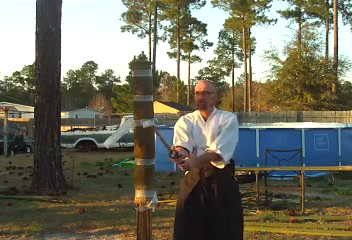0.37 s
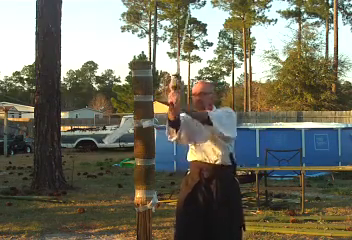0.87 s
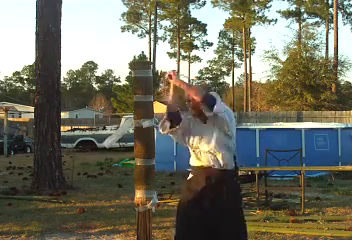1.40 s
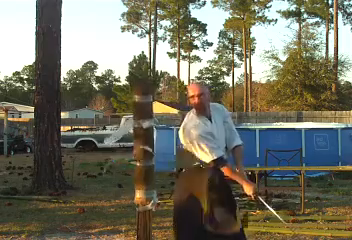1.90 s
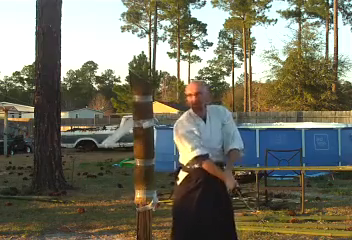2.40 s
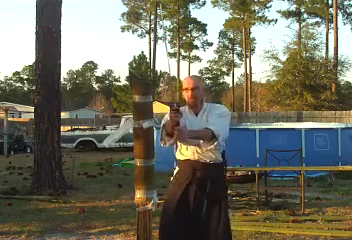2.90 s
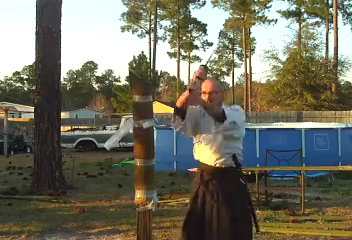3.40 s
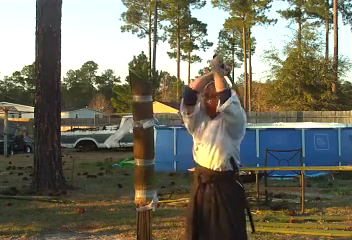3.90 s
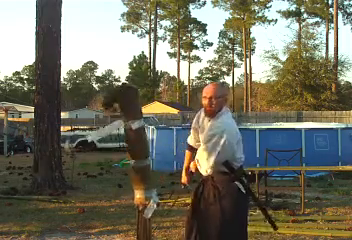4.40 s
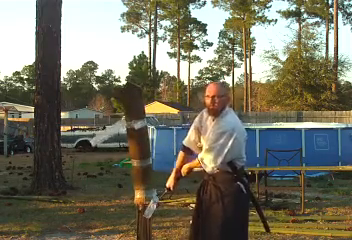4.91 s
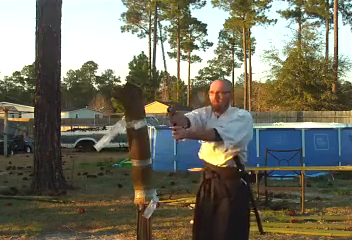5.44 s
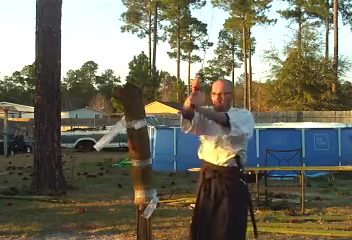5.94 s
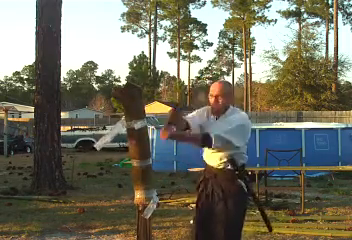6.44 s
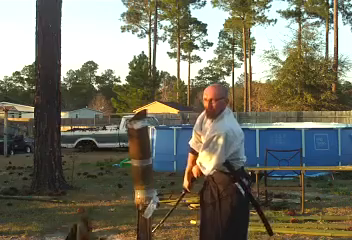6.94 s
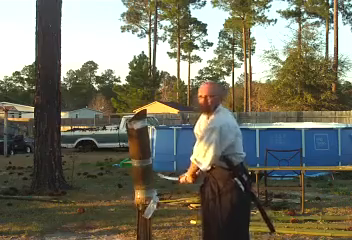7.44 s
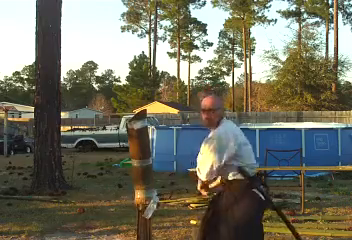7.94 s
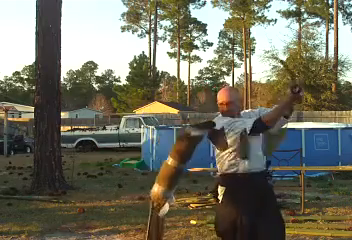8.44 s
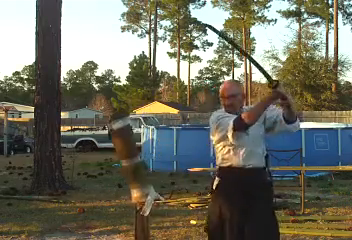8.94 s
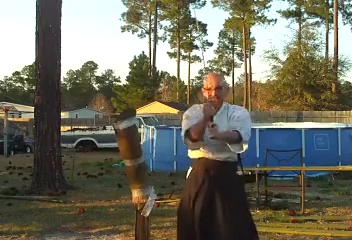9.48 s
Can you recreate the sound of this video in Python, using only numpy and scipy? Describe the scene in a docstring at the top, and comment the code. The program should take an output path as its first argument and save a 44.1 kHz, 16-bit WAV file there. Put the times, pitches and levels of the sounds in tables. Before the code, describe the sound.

A blade whooshes faintly and cracks through dense straw four times outdoors; cut pieces knock and rustle on dry ground amid windy rumble.

```python
"""Sword cuts through a rolled straw mat

In an open yard a sword cuts four times through a straw roll; the pieces drop, bounce and scuff on the ground.
Bursts of breaking stalks ring resonances of the roll, and struck modes add the blows, thumps and a hum.
Trunks, fences and walls send back echoes; shaped noise makes the rumble of wind and traffic and a steady hiss.
The loudest peaks overload the microphone and clip flat."""
import sys
import numpy as np
from scipy import signal
from scipy.io import wavfile

SR = 44100
rng = np.random.default_rng(int(sys.argv[2]) if len(sys.argv) > 2 else 0)


def gain_from_db(level_db):
    """Turn a decibel level (scalar or array-like) into a linear amplitude factor."""
    decades = np.asarray(level_db, float) / 20
    return 10 ** decades


def to_wav(s):
    """Save 16-bit WAV."""
    ch = np.atleast_2d(s).T  # columns
    pcm = np.round(np.clip(ch, -1, 1) * 32767)  # PCM
    wavfile.write(sys.argv[1], SR, pcm.astype(np.int16))


N = 422919


def rms_one(x):
    """Scale to rms 1."""
    return x / np.sqrt(np.mean(x ** 2) + 1e-20)


def drift(corner_hz):
    """Slow random wandering of rms 1: noise through a double pole, made at every 40th sample."""
    r = np.exp(-2 * np.pi * corner_hz * 40 / SR)
    noise = rng.standard_normal(N // 40 + 2002)
    slow = signal.lfilter([1], [1, -2 * r, r * r], noise)[2000:]   # the filter has settled by then
    return np.interp(np.arange(N) / 40, np.arange(len(slow)), rms_one(slow))


def resonance(x, hz, width_hz):
    """Two-pole band with gain 1 on top."""
    r = np.exp(-np.pi * max(width_hz, 5) / SR)
    zeros = np.array([1, 0, -1]) * (1 - r * r) / 2
    return signal.lfilter(zeros, [1, -2 * r * np.cos(2 * np.pi * hz / SR), r * r], x)


def body(x, modes):
    """Resonances in parallel with alternating signs, scaled so that white noise keeps about its level."""
    power = sum(gain_from_db(db) ** 2 * np.pi * width / SR for hz, width, db in modes)
    ringing = sum((-1) ** k * gain_from_db(db) * resonance(x, hz, width) for k, (hz, width, db) in enumerate(modes))
    return ringing / np.sqrt(power)


def air(gusty_db, patchy_db):
    """Third-octave bands of noise: low ones gust as wind and traffic rumble, higher ones hiss almost evenly."""
    # Noise colour of the open yard. Each row: frequency in Hz, relative density in dB per Hz.
    colour = np.array([(15, -35), (25, -6), (49, -1.5), (76, -6), (141, -2.5), (222, -14), (268, -14.5),
                       (309, -12), (348, -16.5), (676, -19.5), (920, -19.5), (1190, -22.5), (3470, -26),
                       (5710, -35.5), (7240, -48.5), (9410, -87), (15900, -120)])
    # Strength of wind and distant traffic. Each row: time in seconds, rumble rms in dB.
    rumble_level = [(0.0, -37.5), (0.99, -35), (1.39, -38.5), (1.76, -38), (2.0, -43), (2.3, -29),
                    (2.6, -41), (3.42, -40), (4.17, -40.5), (4.38, -34.5), (4.7, -37), (5.3, -40),
                    (6.5, -36), (6.86, -38), (8.25, -40.5), (8.44, -36), (9.16, -43.5), (9.59, -40.5)]
    hiss_db, rumble_top_hz = -42, 220
    gust_shared = 0.7   # weight of the gusting common to all low bands
    gust = drift(5.1)
    edges = 20 * 2 ** (np.arange(0, 27) / 3)
    white = rng.standard_normal((2, N + 8000))   # two noises take turns, so neighbouring bands differ
    rumble, hiss = np.zeros(N), np.zeros(N)
    for k, (low, high) in enumerate(zip(edges, edges[1:])):
        band_pass = signal.butter(2, [low, high], "band", fs=SR, output="sos")
        band = signal.sosfilt(band_pass, white[k % 2])[8000:]
        hz = np.sqrt(low * high)
        density_db = np.interp(np.log(hz), np.log(colour[:, 0]), colour[:, 1])
        if hz > rumble_top_hz:
            hiss += band * gain_from_db(density_db + patchy_db * drift(6.8))
        else:
            rumble += band * gain_from_db(density_db + gusty_db * (gust_shared * gust + drift(5.6)))
    rumble_db = np.interp(np.arange(N) / SR, *np.transpose(rumble_level))
    return gain_from_db(rumble_db) * rms_one(rumble) + gain_from_db(hiss_db) * rms_one(hiss)


def yard(x):
    """A few coloured echoes and a short scattered tail from trunks, fences and walls."""
    # Echoes off things in the yard.
    # Each row: delay in ms, level in dB, centre in Hz, width in Hz.
    echoes = [(20.33, -7, 2250, 670), (29.86, -13, 4700, 2600), (45, -15, 780, 3100),
              (54.15, -22.5, 780, 1100), (67, -18, 3200, 810), (86, -23, 780, 320)]
    tail_db, t60_s, build_up_s, low_hz, high_hz = -13, 0.4, 0.0099, 780, 10500
    t = np.arange(SR // 2) / SR
    envelope = gain_from_db(-60 * t / t60_s) * (1 - np.exp(-(t / build_up_s) ** 2))
    scatter = rng.standard_normal(len(t)) * envelope
    scatter = signal.sosfilt(signal.butter(1, [low_hz, high_hz], "band", fs=SR, output="sos"), scatter)
    response = gain_from_db(tail_db) * scatter / np.sqrt(np.sum(scatter ** 2))
    for delay_ms, level_db, hz, width_hz in echoes:
        click = 1. * (np.arange(len(t)) == int(delay_ms * SR / 1000))
        response += gain_from_db(level_db) * resonance(click, hz, width_hz)
    return signal.fftconvolve(x, response)[:N]


def knocks(rows, modes, reach_oct, brief_damping=0, brief_reach=0):
    """Each blow rings the modes near its struck pitch; they swell over the contact time and die away.

    Modes reach_oct from the struck pitch lose 6 dB after a 1 ms contact. Ringing time goes as contact ms
    to the power brief_damping, reach as contact ms to minus brief_reach."""
    out = np.zeros(N)
    hz, mode_db, t60_ms = np.transpose(modes)[:, :, None]
    for s, level_db, struck_hz, contact_ms in rows:
        i, contact_ms = int(s * SR), max(contact_ms, .01)
        ms = np.arange(min(N - i, SR // 2)) * 1000 / SR
        distance = np.log2(hz / struck_hz) / reach_oct * contact_ms ** brief_reach
        mode_level_db = level_db + mode_db - 6 * distance ** 2
        dying = gain_from_db(mode_level_db - 60 * ms / (t60_ms * contact_ms ** brief_damping))
        ringing = np.sum(dying * np.sin(2 * np.pi * hz * ms / 1000), axis=0)
        out[i:i + len(ms)] -= (1 - np.exp(-ms / contact_ms)) * ringing
    return out


def thumps():
    """Soft thumps ring the low modes of the stand and the ground."""
    # Each row: start in seconds, level in dB, struck pitch in Hz, contact in ms.
    blows = [(1.652, -11.5, 62.6, 2.2), (1.655, -9, 232, 0.74), (1.772, -28, 45, 2.4),
             (1.85, -19.5, 60, 2.5), (2.26, -19, 62.5, 2.8), (4.26, -12, 57, 2.64), (4.44, -17.5, 112, 1.8),
             (6.61, -12.5, 56, 4.3), (7.2, -23, 52.3, 3.07), (8.405, -17, 107, 3.3), (8.745, -8, 169, 2.8)]
    # Stand and ground. Each row: frequency in Hz, level in dB, T60 in ms.
    stand = [(45, 5.5, 400), (57, 1, 125), (117, 7.5, 37), (175, -2, 19), (232, -1, 70)]
    return knocks(blows, stand, reach_oct=0.13)


def hum():
    """A hollow piece is struck and hums on in two close modes."""
    # Each row: start in seconds, level in dB, struck pitch in Hz, contact in ms.
    blows = [(4.873, -21.5, 306, 0.68)]
    # Hollow piece. Each row: frequency in Hz, level in dB, T60 in ms.
    piece = [(302, -3.5, 530), (312, 0, 120)]
    return knocks(blows, piece, reach_oct=0.93)


def fibres(per_s, spread_db):
    """Straw stalks break at random moments with uneven strength; rms 1."""
    sizes = gain_from_db(spread_db * np.minimum(rng.exponential(1, N), 4)) * rng.choice([-1, 1], N)
    return rms_one(sizes * (rng.random(N) < per_s / SR))


def mat(contacts, rise_ms, t60_ms, t60_per_ms, per_s, litter):
    """Breaking stalks, held while the contact lasts and then dying, ring the roll, the weave and the straw.

    Dying time is t60_ms plus t60_per_ms for each ms of contact."""
    # Resonances of the rolled mat, from its hollow through its weave to single straws.
    # Each row: frequency in Hz, width in Hz, relative level in dB.
    hollow = [(230, 60, 1), (320, 233, 1.5), (571, 190, 0)]
    weave = [(856, 327, -0.5), (1132, 169, -2.5), (1345, 106, -6.5)]
    straw = [(2160, 400, 5), (2360, 180, 3.5), (3000, 140, -0.5), (4800, 1600, 0.5), (5340, 200, -19)]
    t, power = np.arange(N) / SR, np.zeros((3, N))
    for s, level_db, hold_ms, hollow_db, straw_db in contacts:
        i = slice(int(s * SR), min(N, int((s + .4) * SR)))
        ms = np.maximum(t[i] - s, 0) * 1000
        dying_db = -60 * np.maximum(ms - hold_ms, 0) / (t60_ms + t60_per_ms * hold_ms)
        shape = (1 - np.exp(-ms / rise_ms)) * gain_from_db(dying_db)
        part_db = level_db + np.array([[hollow_db], [0], [straw_db]])
        power[:, i] += (gain_from_db(part_db) * shape) ** 2
    hollow_force, weave_force, straw_force = np.sqrt(power) + 1e-18
    dull, crisp = fibres(per_s, spread_db=0.5), fibres(per_s * 1.7, spread_db=3.5)
    out = body(hollow_force * dull, hollow) + body(weave_force * dull, weave) + body(straw_force * crisp, straw)
    if litter:   # dry needles crackle under the pieces
        out += gain_from_db(4.5) * body(straw_force * crisp, [(4480, 1470, 0)])
    return out


def falls():
    """Pieces land, bounce and scuff: stalks crumple and the dry litter under them crackles."""
    # Each row: start in seconds, level in dB, crumpling in ms, hollow and straw in dB relative to the weave.
    contacts = [(2.231, -18, 19, 3, -11.5), (2.266, -19, 14, 3, -10), (2.288, -21.5, 14.7, -2, -13.5),
                (2.339, -28, 2.7, -1, -6), (2.421, -21, 8.1, 9.5, -16.5), (2.492, -34.5, 8, 5, -17),
                (4.438, -22.5, 5.6, 0, -19), (4.454, -28, 1.8, 5.5, -24), (4.548, -39, 3.3, -3, -13),
                (4.644, -29, 6.8, -13, -21), (4.674, -17, 2, -2.5, -15.5), (4.701, -34.5, 2.3, 6, -16),
                (4.801, -34.5, 9.6, 0, -10), (4.813, -35.5, 20, 7, -14), (4.838, -34.5, 12, 3, -4),
                (4.852, -28, 21, 0.5, -17), (5.015, -30, 10.8, 0, -14.5), (7.148, -38, 5, -9, -9),
                (7.186, -31, 8.6, 8, -19), (7.197, -24, 18, 0, -17), (7.213, -26.5, 16, 8, -13),
                (8.732, -38, 21, 5.5, -28), (8.998, -30.5, 8, -14, -17), (9.018, -37, 16, 2, -16)]
    return mat(contacts, rise_ms=0.37, t60_ms=36, t60_per_ms=4.3, per_s=1600, litter=True)


def snaps():
    """Single blows ring the modes of the mat; brief nicks die sooner and excite a wider range."""
    # Blows on the mat and its pieces.
    # Each row: start in seconds, level in dB, struck pitch in Hz, contact in ms.
    blows = [(1.652, 2.5, 718, 2.2), (1.6505, -7.5, 590, 0.62), (1.660, -14, 746, 1.2),
             (2.422, -11, 460, .36), (2.423, -18, 2080, 0.61), (4.259, 0, 740, 1.7),
             (4.279, -10, 3000, 1.7), (4.439, -6.5, 590, 0.31), (4.4425, -14, 870, 0.12),
             (4.548, -30, 865, 1.2), (4.6742, -7.5, 1550, .02), (4.701, -19, 1490, 0.055),
             (4.813, -17, 1090, 0.17), (4.852, -5.5, 4200, .5), (6.6072, 3, 2260, 0.11),
             (6.609, 3.5, 316, 1.2), (6.610, -4, 810, 0.52), (8.2873, -3.5, 706, 0.36),
             (8.2886, 9, 327, .2), (8.290, -6.5, 1450, 0.31), (8.307, -10.5, 2700, .4),
             (8.304, 0, 1040, 0.96), (8.591, -9, 205, 0.12), (8.732, -25, 600, 0.085),
             (8.744, -27, 600, 0.16), (8.9975, -16.5, 1400, .3)]
    # Struck mat. Each row: frequency in Hz, level in dB, T60 in ms after a 1 ms contact.
    mat_modes = [(205, 0.5, 9), (322, -0.5, 29), (440, -6, 48), (590, -1, 40), (739, -2.5, 29),
                 (834, 0.5, 64), (1016, -6, 28), (1398, -2.5, 58), (2055, -6.5, 26), (2250, -9.5, 41),
                 (3000, 3.5, 11), (4150, -9.5, 8.3)]
    return knocks(blows, mat_modes, reach_oct=0.17, brief_damping=0.34, brief_reach=0.3)


def swish():
    """Air torn by the blade, a narrow band of noise, swells and fades as it sweeps past before each cut."""
    # Each row: loudest moment in seconds, level in dB, centre in Hz.
    sweeps = [(1.635, -47, 1000), (4.247, -37.5, 1230), (6.595, -42.5, 1200), (8.232, -38, 650)]
    swell_ms, width_share = 15, 0.17   # width as a share of the centre frequency
    ms, noise = np.arange(N) * 1000 / SR, rng.standard_normal(N)
    out = np.zeros(N)
    for s, level_db, hz in sweeps:
        swell = np.exp(-((ms - s * 1000) / swell_ms) ** 2)
        out += gain_from_db(level_db) * swell * body(noise, [(hz, width_share * hz, 0)])
    return out


def cuts():
    """The blade tears through dense stalks, and after the last cut the leaning roll tears on."""
    # Blade through the mat, then the later tearing.
    # Each row: start in seconds, level in dB, tearing in ms, hollow and straw in dB relative to the weave.
    blade = [(1.649, -10, 12.5, -5.5, -13.5), (4.256, -14, 13, 0, -7), (6.606, -7.5, 9.1, -7, -14),
             (8.287, -12.5, 13.3, -4.5, -19)]
    tearing_on = [(8.328, -24.5, 23, -9, -10.5)]
    return mat(blade + tearing_on, rise_ms=1.2, t60_ms=69, t60_per_ms=4.9, per_s=5000, litter=False)


def flicker(x):
    """Patches of treble about 90 Hz wide and 50 ms long fall silent at random, more often towards the top."""
    # Flicker of the treble. Each row: frequency in Hz, share of patches that are silent.
    silent_share = [(4600, 0), (5400, .1), (6000, .45), (6600, .7), (7400, .85)]
    hz, t, parts = signal.stft(x, SR, nperseg=2048)
    draws = rng.random((len(hz) // 4 + 1, len(t) // 2 + 1))
    draws = draws.repeat(4, axis=0).repeat(2, axis=1)[:len(hz), :len(t)]
    silent = draws < np.interp(hz, *np.transpose(silent_share))[:, None]
    return signal.istft(parts * ~silent, SR, nperseg=2048)[1][..., :N]


def scene():
    """Cuts, falls and blows ring in the yard over thumps, a hum and the air."""
    hits = cuts() + falls() + snaps() + swish()
    # these sounds reach the microphone without their top treble
    hits = signal.sosfilt(signal.butter(4, 6100, fs=SR, output="sos"), hits)
    mix = hits + yard(hits) + thumps() + hum() + air(gusty_db=2.5, patchy_db=.5)
    return mix[None]


def low_pass(x):
    """Removes everything above the highest recorded frequency."""
    return signal.sosfilt(signal.butter(12, 7390, fs=SR, output="sos"), x)


def record(dry):
    """The treble is cut off steeply and flickers, then the loudest peaks clip flat."""
    steep = signal.ellip(10, .5, 80, 7300, fs=SR, output="sos")   # 0.5 dB ripple, 80 dB down, edge in Hz
    dull = signal.sosfilt(steep, dry)
    clipped = np.clip(flicker(dull), -1, 1)
    return low_pass(clipped)


dry = scene()
out = record(dry)
to_wav(out)
```